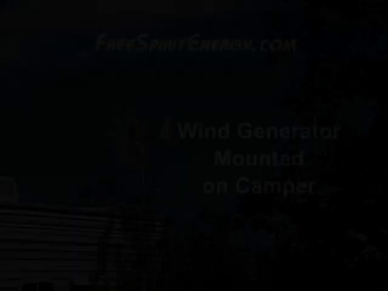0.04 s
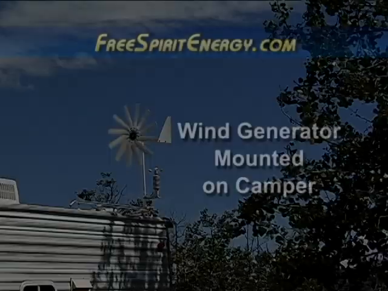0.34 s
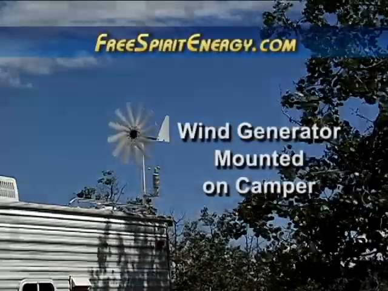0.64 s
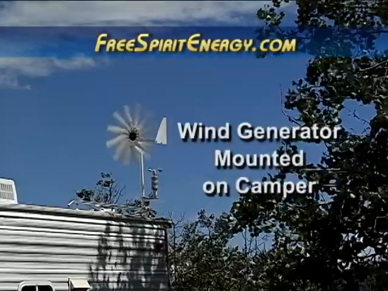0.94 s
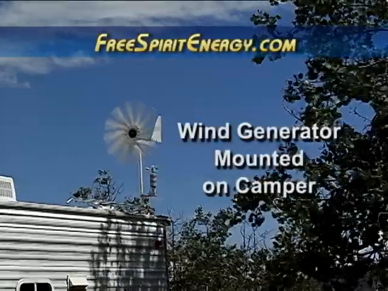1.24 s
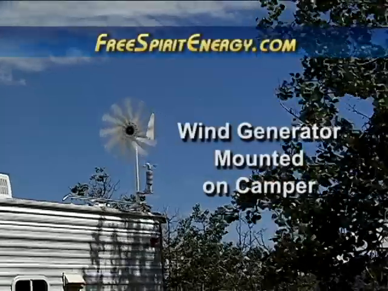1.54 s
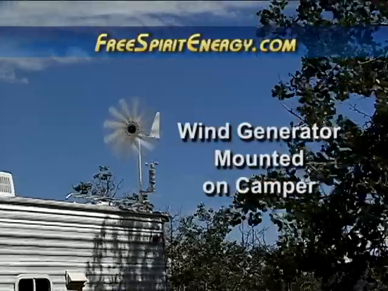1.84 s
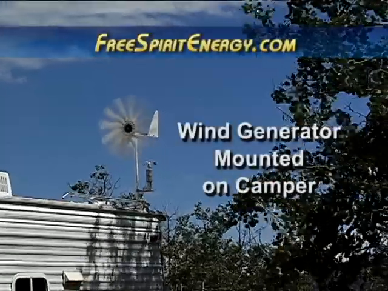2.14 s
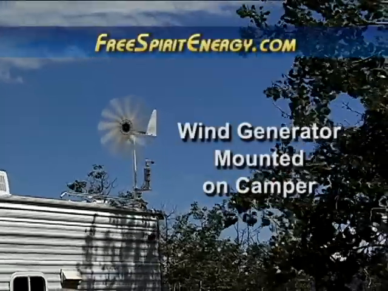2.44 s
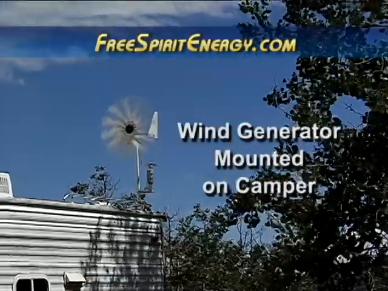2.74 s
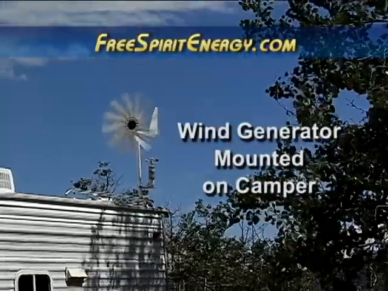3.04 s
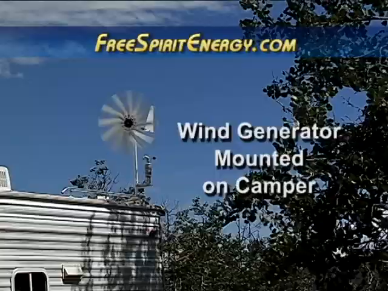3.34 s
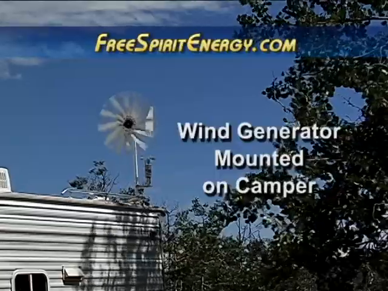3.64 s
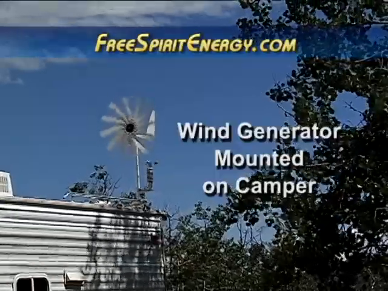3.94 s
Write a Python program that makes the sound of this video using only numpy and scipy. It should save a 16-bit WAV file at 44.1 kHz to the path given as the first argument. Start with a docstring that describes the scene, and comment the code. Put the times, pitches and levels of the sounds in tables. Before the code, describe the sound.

Wind rumbles and flutters on an outdoor microphone while leaves hiss softly behind.

```python
"""Gusty wind on an outdoor stereo microphone fades in over the first half second, harder on the left.
Big slow swirls of air thump in the bass; each gust sheds smaller ones that flutter and brighten the roar.
Behind it trees hiss with faint leaf ticks, and a small turbine rushes softly, most near one second.
The heaviest thump comes at two seconds, then three nearer dry ticks of leaves or twigs.
Toward the end the turbine sinks away, while the hiss of the trees keeps slowly rising."""
import sys
import numpy as np
from scipy import signal
from scipy.fft import rfft, irfft
from scipy.io import wavfile

SR = 44100
rng = np.random.default_rng(int(sys.argv[2]) if len(sys.argv) > 2 else 0)


def put_to_file(sound):
    """Save the sound as 16-bit audio at rate SR, in the file named by the first command-line argument."""
    columns = np.atleast_2d(sound).T  # one column per channel
    safe = np.clip(columns, -1, 1)
    whole_steps = np.round(safe * 32767)
    wavfile.write(sys.argv[1], SR, whole_steps.astype(np.int16))


N = 176400  # four seconds


def undb(db):
    """Turn decibels into a number to multiply a sound by."""
    return 10 ** (np.asarray(db) / 20)


def unit(x):
    """Scale a signal so its average strength (rms) is 1."""
    return x / np.sqrt(np.mean(x ** 2))


def over_time(table, column=1):
    """Join a table's points with straight lines, giving a value for every sample."""
    rows = np.array(table, float)
    return np.interp(np.arange(N) / SR, rows[:, 0], rows[:, column])


def at_pitch(table, hz, column=1):
    """Read a table at any pitch, sliding between its rows in octaves."""
    rows = np.array(table, float)
    return np.interp(np.log(np.maximum(hz, 1)), np.log(rows[:, 0]), rows[:, column])


def pitches():
    """The pitch in Hz of each slot in a spectrum."""
    return np.arange(N // 2 + 1) * SR / N


def wobble(hz):
    """A smooth random wobble of typical size 1; a higher hz makes it quicker."""
    return unit(irfft(rfft(rng.standard_normal(N)) * np.exp(-(pitches() / hz) ** 2), N))


def band(x, hz, octaves):
    """Keep only the sound around one pitch, with soft edges."""
    octaves_away = np.log2(np.maximum(pitches(), 1) / hz)
    return irfft(rfft(x) * np.exp(-.5 * (octaves_away / octaves) ** 2), N)


def stereo_noise(tone, stereo):
    """Left and right spectra of a noise: partly alike, unequally loud and a little out of step."""
    hz = pitches()
    alike = at_pitch(stereo, hz)
    shared, opposite = rfft(rng.standard_normal((2, N)))
    shared, opposite = shared * np.sqrt(1 + alike), opposite * np.sqrt(1 - alike)
    right_lead = np.exp(1j * at_pitch(stereo, hz, column=3))
    pair = np.array([shared + opposite, (shared - opposite) * right_lead])
    balance_db = np.outer([.5, -.5], at_pitch(stereo, hz, column=2))
    return pair * undb(at_pitch(tone, hz) + balance_db)


# gusts; only the swing around the average counts (time [s], level [dB])
GUSTS = [(0.45, -42.5), (0.55, -41), (0.57, -46), (0.6, -37), (0.7, -45.5), (0.71, -42.5), (0.98, -36.5),
         (1.13, -52), (1.19, -51), (1.23, -36), (1.26, -41.5), (1.35, -42.5), (1.38, -31.5), (1.43, -38),
         (1.76, -55), (1.79, -46), (2.06, -48.5), (2.07, -36.5), (2.1, -50.5), (2.2, -37), (2.21, -43),
         (2.24, -38), (2.31, -48.5), (2.67, -47.5), (2.73, -36), (2.76, -42.5), (2.77, -37), (2.82, -31),
         (2.83, -33.5), (2.96, -32.5), (3.0, -38.5), (3.12, -40), (3.2, -56.5), (3.35, -41.5), (3.51, -53),
         (3.57, -39.5), (3.69, -38), (3.74, -49.5), (3.85, -39.5), (3.93, -52.5), (3.95, -44), (4.0, -42)]
# thumps of the big swirls; again only the swing counts (time [s], level [dB])
THUMPS = [(0.45, -39.5), (0.49, -41.5), (0.61, -32), (0.69, -36.5), (0.82, -33.5), (0.85, -38), (0.9, -39),
          (0.92, -41), (1.01, -29.5), (1.08, -42), (1.14, -29.5), (1.19, -41), (1.23, -34.5), (1.64, -34.5),
          (1.72, -41.5), (1.76, -35), (1.9, -26), (1.92, -35), (2.02, -38.5), (2.04, -23.5), (2.12, -36),
          (2.14, -29.5), (2.23, -40.5), (2.51, -34.5), (2.61, -43), (2.83, -26.5), (2.88, -32.5),
          (2.9, -25.5), (3.0, -44), (3.07, -34), (3.1, -30), (3.18, -38), (3.4, -39.5), (3.5, -41),
          (3.57, -31.5), (4.0, -34.5)]
# the wind's tone, mostly bass (pitch [Hz], relative level [dB])
WIND_TONE = [(20, -16), (35, -1.5), (70, -0.5), (130, -4), (240, -5.5), (300, -10), (390, -10.5),
             (500, -15), (620, -20.5), (800, -24.5), (1100, -35), (1600, -47), (3000, -58)]
# how much each pitch follows the air (pitch [Hz], gusts [times], thumps [times], flutter [times])
WIND_RESPONSE = [(40, 0.021, 1, 0.28), (94, .05, 0.91, 0.69), (193, 0.59, 0.19, 1.03),
                 (405, 0.9, 0.11, 1.28), (900, 1.76, 0.14, 0.63)]
# the wind in each ear (pitch [Hz], likeness [0-1], left minus right [dB], right's phase lead [rad])
WIND_STEREO = [(60, 0.74, 6, -0.013), (171, 0.85, 6, -0.17), (275, 0.57, 5.5, 0.052), (450, 0.56, 3, -0.29),
               (600, 0.35, 2.5, 0.74), (800, 0.7, 3, 1.45), (1400, 0, 3.5, 2)]
# the wind swings from side to side (time [s], extra left minus right [dB])
WIND_VEER = [(.3, 2), (.75, 3), (1, -1.5), (1.6, 0), (2.2, -1.5), (2.55, 2.5), (2.9, 1), (3.3, -2), (4, -2)]


def wind_on_microphone(level_db=-30, flutter_hz=57, flicker_hz=51):
    """Swirling air beats on the microphone; small, higher-sounding swirls grow fastest in a gust."""
    air = stereo_noise(WIND_TONE, WIND_STEREO)
    gust, thump = over_time(GUSTS), over_time(THUMPS)
    gust, thump = gust - gust.mean(), thump - thump.mean()
    flutter = 1.07 * wobble(flutter_hz)  # shared by swirls of every size
    half_octaves = 2 * np.log2(np.maximum(pitches(), 1) / 20)
    roar = 0
    for step in range(15):  # one swirl size every half octave, up from 20 Hz
        hz = 20 * 2 ** (step / 2)
        swirls = irfft(air * np.maximum(1 - abs(half_octaves - step), 0), N)
        by_gust, by_thump, by_flutter = (at_pitch(WIND_RESPONSE, hz, column) for column in (1, 2, 3))
        swing_db = by_gust * gust + by_thump * thump + by_flutter * flutter
        flicker_db = wobble(flicker_hz)  # each size also flickers on its own
        roar = roar + swirls * unit(undb(swing_db + flicker_db))
    veer = undb(np.outer([.5, -.5], over_time(WIND_VEER)))
    return undb(level_db) * unit(roar * veer)


# how loud the trees hiss (time [s], left level [dB], right level [dB])
TREE_LEVELS = [(.5, -50.5, -57.5), (2, -49, -55.5), (2.5, -48.5, -54.5), (4, -48, -53)]
# the tone of the leaves (pitch [Hz], relative level [dB])
TREE_TONE = [(200, 4), (700, 9.5), (1300, 2), (2000, -1.5), (3200, 0.5), (3900, -4), (4700, -1),
             (6200, -1.5), (7300, -6.5), (9500, -9), (12000, -12), (15500, -16.5)]
# the hiss in each ear (pitch [Hz], likeness [0-1], left minus right [dB], right's phase lead [rad])
TREE_STEREO = [(500, 0.93, 1.5, -1), (1400, 0.65, 0.8, -.2), (2000, 0.43, 2.4, -0.5),
               (3230, 0.4, 0.5, -0.1), (4000, 0.3, 0.5, -2.4), (5300, 0.17, .3, 0.3), (6670, 0.3, -.8, 1.9),
               (8000, 0.28, -0.7, 2.9), (9500, 0.53, -0.7, 3.5), (15000, .17, 1, 2)]


def trees(touches_per_s=300, spread_db=4.5, ticks_vs_hiss_db=-16, rustle_hz=21, rustle_db=0.47):
    """Countless leaves blur into a hiss, while nearer ones tick against each other."""
    hiss = unit(irfft(stereo_noise(TREE_TONE, TREE_STEREO), N))
    touches = rng.random(N) < touches_per_s / SR
    strength = undb(spread_db * np.minimum(rng.exponential(size=N), 4))  # most soft, a few hard
    clicks = touches * strength * rng.standard_normal((2, N))
    ticks = unit(irfft(rfft(clicks) * undb(at_pitch(TREE_TONE, pitches())), N))
    level_db = np.array([over_time(TREE_LEVELS), over_time(TREE_LEVELS, column=2)])
    return (hiss + undb(ticks_vs_hiss_db) * ticks) * undb(level_db + rustle_db * wobble(rustle_hz))


# how loud the turbine rushes (time [s], left level [dB])
TURBINE_LEVELS = [(.4, -61), (.9, -58), (1.5, -62), (2.2, -62.5), (3.1, -64), (4, -65.5)]


def turbine(hz=1414, right_db=-10.5):
    """Air rushes over many slow blades, too many to hear one by one."""
    rush = unit(band(rng.standard_normal(N), hz, octaves=0.43))
    return np.outer(undb([0, right_db]), rush * undb(over_time(TURBINE_LEVELS)))


# three dry ticks close by (time [s], left peak level [dB], pitch [Hz])
NEAR_TICKS = [(2.243, -40, 5660), (2.8495, -42, 8600), (3.128, -41, 2690)]


def near_ticks(decay_s=0.00094, right_db=-7):
    """Leaves or twigs snap on the left, each a tiny burst of noise around its own pitch."""
    snaps = 0
    for start, peak_db, hz in NEAR_TICKS:
        age = np.arange(N) / SR - start
        burst = rng.standard_normal(N) * (age >= 0) * np.exp(-abs(age) / decay_s)
        snap = band(burst, hz, octaves=.38)
        snaps = snaps + snap / abs(snap).max() * undb(peak_db)
    return np.outer(undb([0, right_db]), snaps)


def scene():
    """Wind on the microphone in front of trees, a small turbine and a few close ticks."""
    return wind_on_microphone() + trees() + turbine() + near_ticks()


def record(dry):
    """The sound switches on quietly and fades up steadily; the very highest treble is cut away."""
    t = np.arange(N) / SR
    on_s, fade_s, top_hz = 0.032, .53, 15650
    switch_on = np.clip((t - on_s) / 0.0024, 0, 1)
    fade_in = np.clip((t - 0.0017) / fade_s, 0, 1)
    treble_cut = signal.ellip(12, .1, 90, top_hz, fs=SR, output="sos")
    return signal.sosfilt(treble_cut, dry * switch_on * fade_in)


dry = scene()
out = record(dry)
put_to_file(out)
```